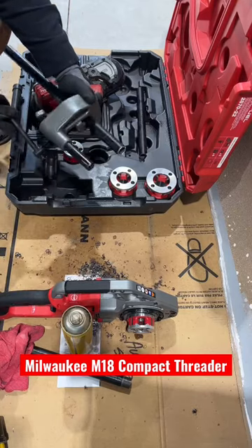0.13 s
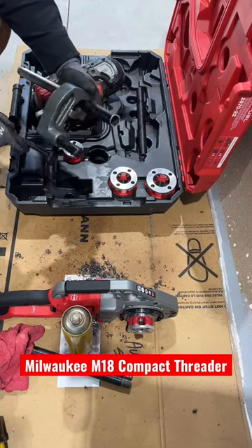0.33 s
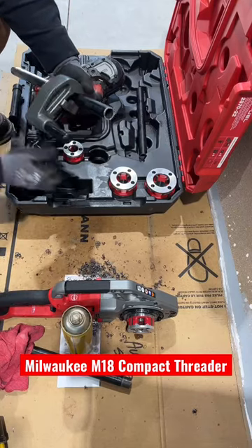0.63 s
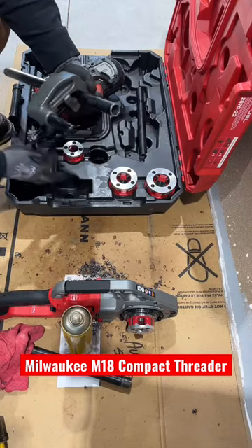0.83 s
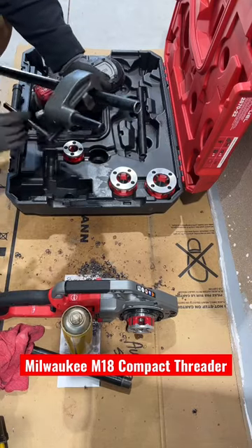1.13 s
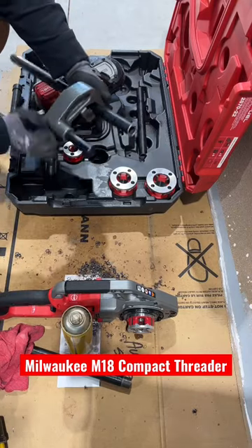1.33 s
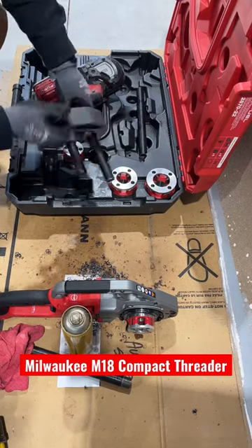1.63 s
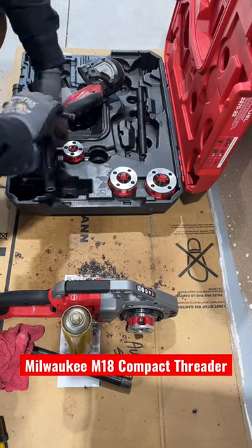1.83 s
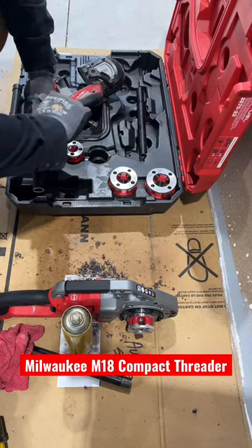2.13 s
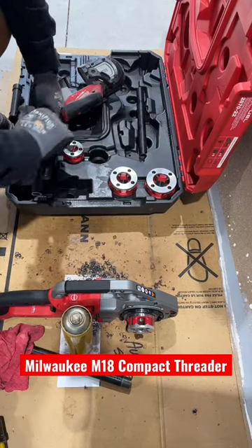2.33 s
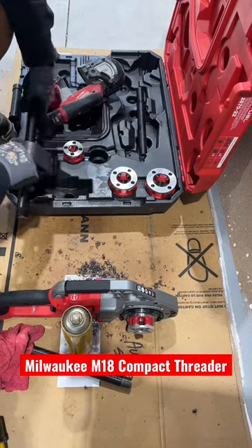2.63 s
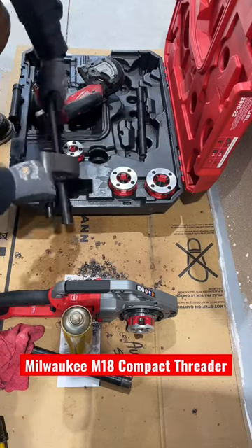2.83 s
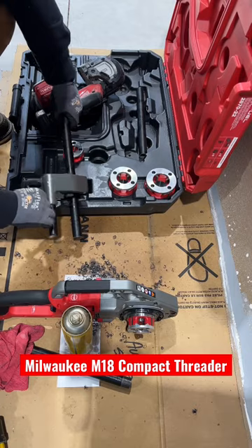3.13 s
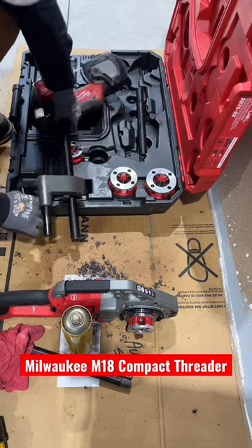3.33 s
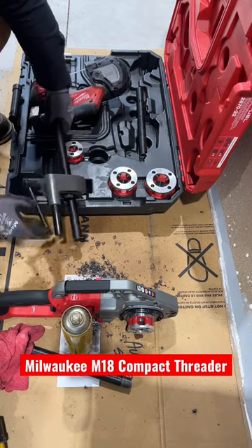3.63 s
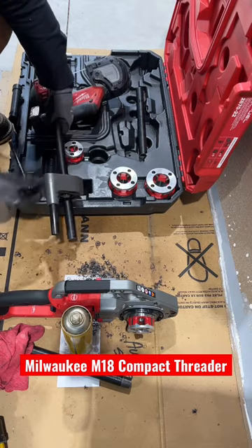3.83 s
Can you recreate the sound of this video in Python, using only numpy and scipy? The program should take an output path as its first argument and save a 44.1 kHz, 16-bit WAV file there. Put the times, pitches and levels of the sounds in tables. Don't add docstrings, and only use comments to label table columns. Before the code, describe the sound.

A heavy steel tool arm drops onto a hollow plastic case, booming, then scrapes and clanks

```python
import sys
import numpy as np
from scipy import signal
from scipy.fft import rfft, irfft
from scipy.io import wavfile

SR = 44100
rng = np.random.default_rng(int(sys.argv[2]) if len(sys.argv) > 2 else 0)


def invert_db(x):
    u = np.asarray(x, float) / 20
    return 10 ** u


def int16_out(signal):
    q = np.round(np.clip(np.atleast_2d(signal).T, -1, 1) * 32767)
    wavfile.write(sys.argv[1], SR, q.astype(np.int16))


N = 176400
T = np.arange(N) / SR
EDGES_HZ = 28 * 2 ** np.arange(0, 9.4, .5)


def rms_one(x):
    return x / np.sqrt(np.mean(x ** 2) + 1e-20)


def at_hz(points, hz):
    table_hz, value = np.transpose(points)
    return np.interp(np.log(hz), np.log(table_hz), value)


def drift(rate_hz):
    r = np.exp(-2 * np.pi * rate_hz * 40 / SR)
    slow = signal.lfilter([1], [1, -2 * r, r * r], rng.standard_normal(N // 40 + 2002))[2000:]
    return np.interp(np.arange(N) / 40, np.arange(len(slow)), rms_one(slow))


def bands(size):
    white = rng.standard_normal((2, 2, size + 2000))
    for k, (low, high) in enumerate(zip(EDGES_HZ, EDGES_HZ[1:])):
        band = signal.butter(2, [low, high], "band", fs=SR, output="sos")
        yield np.sqrt(low * high), signal.sosfilt(band, white[k % 2])[:, 2000:]


def stereo(pair, alike):
    alike = np.clip(alike, 0, 1)
    return np.sqrt(1 + alike) * pair[0] + np.sqrt(1 - alike) * pair[1] * [[1], [-1]]


# f/Hz, likeness/0-1
LIKENESS = [(170, 0.99), (450, 0.93), (1000, 0.53), (1700, 0.52), (3200, 1), (4400, 0.68), (7000, 0.77),
            (10000, 0.47)]


def hiss(spectrum, patchy_db, alike):
    total = 0
    for hz, pair in bands(N):
        rolloff_db = 18 * min(0, np.log2(hz / spectrum[0][0]))
        level_db = at_hz(spectrum, hz) + rolloff_db + patchy_db * drift(11.0)
        total = total + invert_db(level_db) * stereo(pair, alike * at_hz(LIKENESS, hz))
    return rms_one(total)


def swells(rows):
    return sum(invert_db(db) ** 2 * np.exp(-(3.59 * (T - mid) / length) ** 2) for mid, length, db in rows)


def resonate(x, hz, width_hz):
    r = np.exp(-np.pi * width_hz / SR)
    poles = [1, -2 * r * np.cos(2 * np.pi * hz / SR), r * r]
    return signal.lfilter([(1 - r * r) / 2, 0, (r * r - 1) / 2], poles, x)


def add(out, sound, s):
    i = int(s * SR)
    out[i:i + len(sound)] += sound[:len(out) - i]


def ring(modes, rise_s):
    t, total = T[:SR // 3], 0
    for hz, db, t60 in modes:
        luck, phase = rng.standard_normal(2)
        rise = 1 - np.exp(-t / (rise_s + 0.36 / hz))
        decay = invert_db(db + 1.53 * luck - 60 * t / min(t60, .4))
        beating = 1 + 0.67 * np.sin(hz * t / 40 + luck)
        total = total + rise * decay * beating * np.sin(2 * np.pi * hz * t + phase)
    return total


def tilt(bright_db, hz):
    return bright_db * np.clip(np.log2(hz / 600), 0, 2)


# f/Hz, t60/s
ROOM_T60 = [(100, 0.43), (400, 0.57), (5000, 0.54), (14000, 0.37)]
ROOM_DB, ROOM_DELAY_S = -19.5, 0.0027


def blows(touches, spectrum, cycles, least_s, rise_cycles, tail_db, modes, ring_db):
    start = int(touches[0][0] * SR)
    size = min(N - start, int((touches[-1][0] + .6) * SR) - start)
    out, rings, t = np.zeros((2, N)), np.zeros(N), T[:int(.6 * SR)]
    top = np.sqrt(sum(invert_db(at_hz(spectrum, hz)) ** 2 * hz / SR for hz in EDGES_HZ))
    for hz, pair in bands(size):
        direct, tail = np.zeros(size), np.zeros(size)
        rise = (1 - np.exp(-t / (0.000067 + rise_cycles / hz))) ** 2
        hit = rise * invert_db(-120 * t / (least_s + cycles / hz))
        late = (1 - np.exp(-t / ROOM_DELAY_S)) ** 2
        echo = late * invert_db(2 * tail_db - 120 * t / at_hz(ROOM_T60, hz))
        for s, db, bright_db in touches:
            power = (invert_db(db + at_hz(spectrum, hz) + tilt(bright_db, hz)) / top) ** 2
            add(direct, power * hit, s - start / SR)
            add(tail, power * echo, s - start / SR)
        diffuse = stereo(pair[::-1], 1.05 * at_hz(LIKENESS, hz))
        out[:, start:start + size] += np.sqrt(direct) * pair[0] + np.sqrt(tail) * diffuse
    for s, db, bright_db in touches:
        tilted = [(hz, level_db + tilt(bright_db, hz), t60) for hz, level_db, t60 in modes]
        add(rings, invert_db(db + ring_db) * ring(tilted, 0.00034), s)
    return out + rings


# f/Hz, level/dB per Hz
AIR = [(40, -26), (110, 2.5), (200, -10.5), (400, -14.5), (1000, -23.5), (1900, -35), (3500, -33.5),
       (5500, -46), (16000, -72)]
AIR_DB = -56
# f/Hz, width/Hz, level/dB
HUMS = [(192, 3, -61.5), (1075, 1.3, -81)]


def air():
    out = invert_db(AIR_DB - 3.5) * hiss(AIR, patchy_db=3.5, alike=1)
    for hz, width_hz, db in HUMS:
        level = invert_db(db + 3 + 1.5 * drift(width_hz))
        out = out + level * np.sin(2 * np.pi * hz * T + .4 * drift(width_hz))
    return out


# t/s, level/dB
BUSY = [
    (.35, -74),
    (.5, -77),
    (1.0, -76.5),
    (1.45, -70),
    (1.9, -75.5),
    (2.0, -87),
    (2.45, -87),
    (2.7, -74),
    (3.05, -74),
]
# f/Hz, level/dB per Hz
CLOTH = [(880, -44), (1500, -10), (2400, -6), (3770, 5.5), (4550, -1.5), (13700, -2.5), (16000, -11)]
# middle t/s, length/s, level/dB
SWISHES = [(.48, 0.025, -64.5), (.89, 0.022, -63.5), (.925, 0.06, -63.5), (1.166, 0.0069, -64),
           (1.802, 0.016, -62), (0.363, 0.012, -54.5), (0.638, 0.03, -57.5), (0.702, 0.037, -63),
           (1.209, 0.017, -51), (1.298, 0.068, -62), (1.328, 0.048, -56.5), (1.65, 0.025, -60),
           (1.556, 0.13, -58), (2.558, 0.048, -55.5), (2.589, 0.069, -54), (2.832, 0.057, -54.5),
           (3.36, 0.076, -49.5), (3.565, 0.014, -49.5), (3.865, 0.054, -54.5), (3.985, 0.14, -52.5)]
# middle t/s, length/s, level/dB
SHUFFLES = [
    (.03, 0.33, -58),
    (.22, 0.35, -61.5),
    (.9, 1, -65.5),
    (1.435, 0.16, -57.5),
    (3.53, 0.13, -50.5),
    (3.8, 0.61, -50),
]
# f/Hz, level/dB per Hz
SHUFFLE = [(250, -4), (520, 1), (700, -12.5), (900, -1), (1500, -15), (2500, -11.5), (5000, -54)]


def sleeves():
    s, db = np.transpose(BUSY)
    rubbing = np.sqrt(invert_db(np.interp(T, s, db) + 4.0) ** 2 + swells(SWISHES))
    cloth = rubbing * invert_db(1.47 * drift(86)) * hiss(CLOTH, patchy_db=2.0, alike=1.0)
    shuffling = np.sqrt(swells(SHUFFLES)) * invert_db(2.55 * drift(47))
    return cloth + shuffling * hiss(SHUFFLE, patchy_db=1.0, alike=1)


# t/s, level/dB, brightness/dB
CLINK = [
    (.0628, -41, -1),
    (.0975, -24, 0.5),
    (.1005, -32, -3),
]
# f/Hz, level/dB per Hz
CLINK_CRACK = [(240, -61), (400, -13), (2090, -21), (2400, -7.5), (4440, -3.5), (8900, -15), (10400, -19),
               (16000, -46)]
# f/Hz, level/dB, t60/s
CLINK_RING = [(2405, 7.5, 0.035), (3020, 6, 0.035), (3430, 2, 0.048), (4500, 7.5, .035), (5500, 4, .04),
              (6580, -1, .05), (10300, 6.5, 0.028), (4770, -11, .15), (7220, -5, 0.19), (10300, -11, .35)]


def clink():
    return blows(CLINK, CLINK_CRACK, cycles=33.0, least_s=0.0083, rise_cycles=0.39, tail_db=-23.5,
                 modes=CLINK_RING, ring_db=-19.5)


# middle t/s, length/s, level/dB, f/Hz
RUBS = [
    (0.148, 0.43, -63, 856),
    (1.42, 0.14, -62, 520),
    (1.439, 0.064, -63, 900),
    (1.952, 0.056, -67, 1500),
    (2.552, .03, -62, 3700),
    (2.829, 0.065, -63.5, 3400),
]


def rubs():
    white, out = rng.standard_normal(N), 0
    for mid, length, db, hz in RUBS:
        hollow = resonate(resonate(white, hz, hz / 8), hz, hz / 8)
        out = out + np.sqrt(swells([(mid, length, db)])) * rms_one(hollow)
    return out


# t/s, peak level/dB, f/Hz
TICKS = [(.279, -53.5, 2580), (.570, -60, 3190), (.6025, -58, 1720), (.6325, -56, 10200),
         (1.2057, -46, 4460), (1.207, -48, 7600), (1.208, -57, 1900), (1.3214, -54, 3020),
         (3.3355, -43, 4500), (3.3535, -41, 3697), (3.359, -43, 6540), (3.563, -47, 7200),
         (3.6105, -44, 6200), (3.356, -34, 1780), (3.381, -32.5, 1890), (3.40, -46, 3500),
         (3.568, -41, 1362)]
# t/s, peak level/dB, f/Hz
KNOCKS = [(.282, -43.5, 950), (.699, -47, 510), (2.69, -44, 450), (1.208, -42, 1070), (1.984, -46.5, 900),
          (2.643, -42, 980), (2.683, -30.5, 890), (2.657, -44, 910), (3.0706, -4, 1483), (3.79, -27, 880),
          (3.6105, -26, 1600), (3.73, -26, 190), (3.075, -12, 125)]


def taps(rows, cycles, spread, trim_db):
    out = np.zeros(N)
    for s, db, hz in rows:
        ratios = [1, *spread ** rng.uniform(-1.01, 1, 6)]
        losses_db = [0] + 6 * [12.0]
        modes = [(hz * k, db + trim_db - loss, cycles / hz) for k, loss in zip(ratios, losses_db)]
        add(out, ring(modes, 0.0011), s)
    return out


# t/s, level/dB, brightness/dB
DROP = [(3.0707, -2, -2.5), (3.0742, -1.5, -0.5), (3.079, -11.5, -0.5), (3.0922, -12.5, -0.5),
        (3.123, -29, -13), (3.18, -24, -14), (3.346, -21.5, -5), (3.354, -23.5, 2), (3.361, -19.5, -6),
        (3.378, -23, -4), (3.4, -29.5, 0), (3.547, -35, -14), (3.572, -30, -7), (3.59, -31.5, -12)]
# f/Hz, level/dB per Hz
CASE_CRACK = [(60, -31), (95, -24), (140, 1), (250, -3), (600, -8.5), (1400, -18), (2300, -22),
              (12000, -39.5), (16000, -48)]
# f/Hz, level/dB, t60/s
CASE = [(134, 0.0, 0.11), (195.2, -14, 0.2), (255.2, -0.5, 0.11), (587.4, -10, 0.089), (890, -25, 0.065),
        (1295, -17, 0.02), (1695, -10.5, 0.058), (378, -11.5, 0.095), (475, -14, 0.089), (736, -14, 0.065),
        (1080, -27, .07), (2780, -18.5, 0.099), (3020, -21, 0.089), (3865, -21, 0.13)]
# f/Hz, level/dB, t60/s
ARM_RING = [(12200, -0.5, 0.11), (14580, -1, 0.16)]


def drop():
    out = blows(DROP, CASE_CRACK, cycles=8.1, least_s=0.057, rise_cycles=0.92, tail_db=-21,
                modes=CASE, ring_db=-9.5)
    add(out[0], invert_db(-37) * ring(ARM_RING, .003), DROP[2][0])
    add(out[1], invert_db(-32) * ring(ARM_RING, 0.0024), DROP[2][0])
    return out


# t/s, level/dB, brightness/dB
TAP = [
    (3.6105, -24, -0.1),
    (3.617, -29, -4.5),
]
# f/Hz, level/dB per Hz
TAP_CRACK = [(120, -11), (200, 3.5), (735, 0.5), (2510, -6), (5040, -30.5), (16000, -34)]


def tap():
    return blows(TAP, TAP_CRACK, cycles=42.0, least_s=0.035, rise_cycles=.6, tail_db=-20.5,
                 modes=CASE, ring_db=-9)


# t/s, pressure level/dB, scrape level/dB
SLIDE = [
    (3.656, -68, 1),
    (3.672, -42.5, -6),
    (3.688, -40, -10),
    (3.694, -34.5, 5),
    (3.714, -34.5, -0.5),
    (3.719, -22, -28),
]
# f/Hz, width/Hz, level/dB
SQUEAL = [(1359, 42, 6.5), (2527, 67, -3.5), (3860, 96, -11.5), (5610, 87, -14)]
# f/Hz, width/Hz, level/dB
SHRILL = [(7200, 15, -1), (7310, 47, -1), (8600, 45, -4), (8820, 35, -3), (9230, 33, -1), (10250, 72, -2.5),
          (11600, 130, -9), (12100, 35, -7)]


def sing(slips, body):
    total = 0
    for k, (hz, width_hz, db) in enumerate(body):
        total = total + invert_db(db) * resonate(np.roll(slips, 977 * k), hz, width_hz)
    return rms_one(total)


def slide():
    s, db, scrape_db = np.transpose(SLIDE)
    slips = rng.standard_normal(N) * invert_db(2.0 * np.minimum(rng.exponential(1, N), 3))
    tone, shrill = sing(slips, SQUEAL), sing(slips, SHRILL)
    grit = rms_one(resonate(slips, 9500, 5000))
    pressure = invert_db(np.interp(T, s, db, left=-120, right=-120))
    scrape = invert_db(np.interp(T, s, scrape_db) - 6.0)
    return pressure * (tone + scrape * (shrill + 0.9 * grit))


# t/s, level/dB, brightness/dB
CLANK = [
    (3.717, -11.5, 2),
    (3.7192, -6.5, -9),
]
# f/Hz, level/dB per Hz
CLANK_CRACK = [(90, -25), (250, -11), (560, -0.5), (1200, 2.5), (2500, -14.5), (4300, -10.5), (7000, -15.5),
               (10000, -10), (16000, -19)]
# f/Hz, level/dB, t60/s
CLANK_RING = [(575, -5, .08), (881, 2.5, 0.053), (1220, 7, .03), (2500, -20.5, 0.18), (4160, 3, .02),
              (5100, -24, 0.081), (7300, -26, .13), (9430, 6.5, 0.017), (10370, 3, 0.02), (10820, -11, .06),
              (12200, -5, .02)]


def clank():
    return blows(CLANK, CLANK_CRACK, cycles=28.5, least_s=0.025, rise_cycles=1.56, tail_db=-25,
                 modes=CLANK_RING, ring_db=-14.0)


# f/Hz, level/dB, t60/s
AFTER_RING = [(5560, -43, .4), (5610, -45, .4), (2530, -46, .3), (10900, -49, .3)]


def after_ring(out):
    add(out, ring(AFTER_RING, .003), CLANK[0][0])


def room(x):
    t, tail = T[:SR // 2], 0
    for hz, pair in bands(SR // 2):
        tail = tail + invert_db(-60 * t / at_hz(ROOM_T60, hz)) * stereo(pair, 0.87 * at_hz(LIKENESS, hz))
    tail = tail * (1 - np.exp(-(t / ROOM_DELAY_S) ** 2))
    return signal.fftconvolve(x[None], tail / np.sqrt(np.sum(tail ** 2) / 2), axes=1)[:, :N]


# f/Hz, share
PORT_LEVEL = [(200, 0), (600, .12), (1000, 0.19), (1800, -0.042), (6000, 0.02), (9000, 0.067)]
# f/Hz, share
PORT_TURN = [(600, 0), (1350, 0.41), (2200, 0.026), (4300, -0.14), (7300, .03), (9000, 0.42), (10500, .6),
             (16000, 0.43)]


def ports(x):
    hz = np.fft.rfftfreq(N, 1 / SR) + 1
    share = at_hz(PORT_LEVEL, hz) - 1j * at_hz(PORT_TURN, hz)
    return x + irfft(rfft(x.mean(axis=0)) * share, N) * [[1], [-1]]


def scene():
    ticks = taps(TICKS, cycles=57, spread=1.3, trim_db=4.5)
    knocks = taps(KNOCKS, cycles=14.0, spread=1.61, trim_db=2.0)
    small = rubs() + ticks + knocks + slide()
    after_ring(small)
    rumble_cut = signal.butter(3, 80, "high", fs=SR, output="sos")
    near = signal.sosfilt(rumble_cut, clink() + drop() + tap() + clank() + small)
    return ports(near + invert_db(ROOM_DB) * room(small) + sleeves() + air())


def low_pass(x):
    return signal.sosfilt(signal.butter(12, 16990, fs=SR, output="sos"), x)


def record(dry):
    top_cut = signal.cheby2(10, 60, 16700, fs=SR, output="sos")
    mix = signal.sosfilt(top_cut, np.tanh(dry))
    return low_pass(mix)


dry = scene()
out = record(dry)
int16_out(out)
```